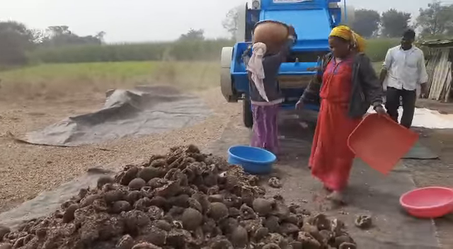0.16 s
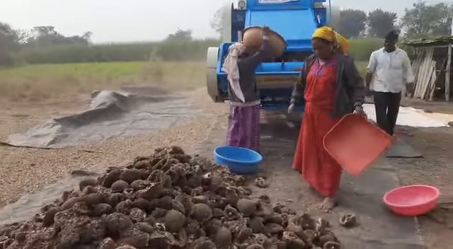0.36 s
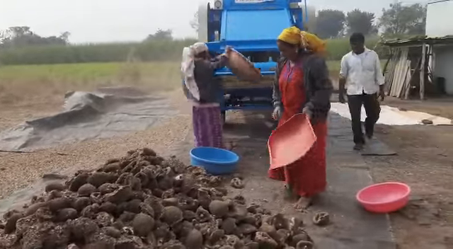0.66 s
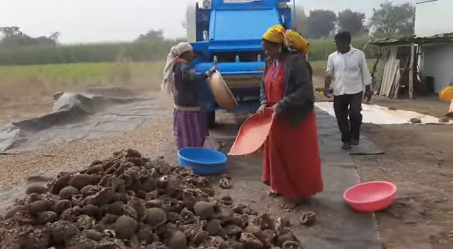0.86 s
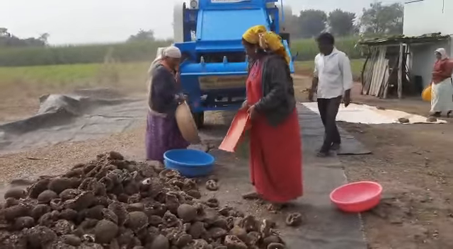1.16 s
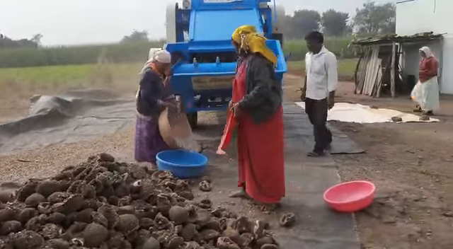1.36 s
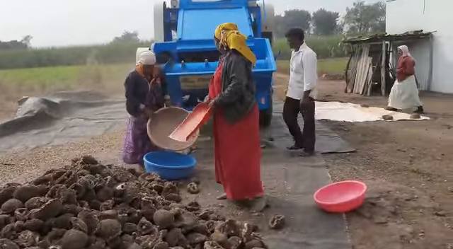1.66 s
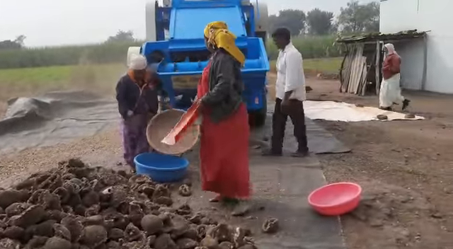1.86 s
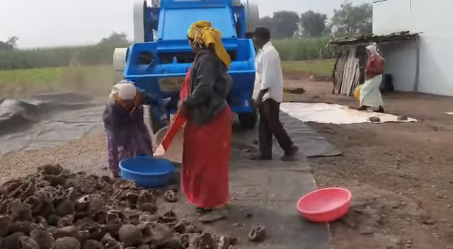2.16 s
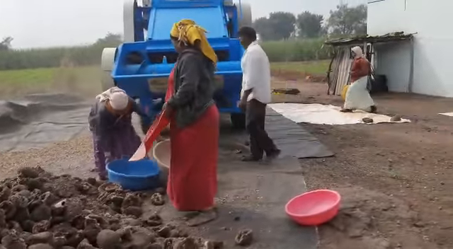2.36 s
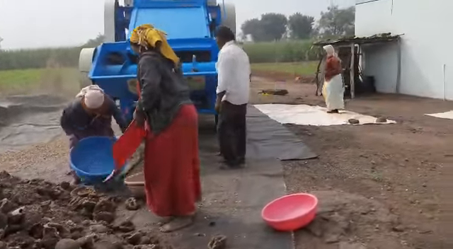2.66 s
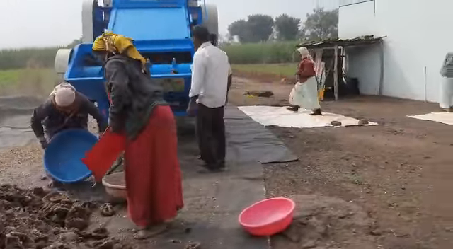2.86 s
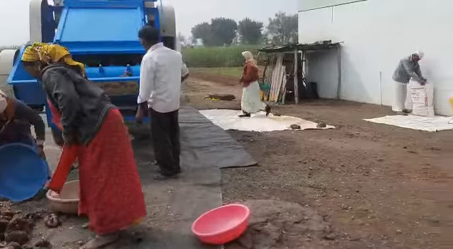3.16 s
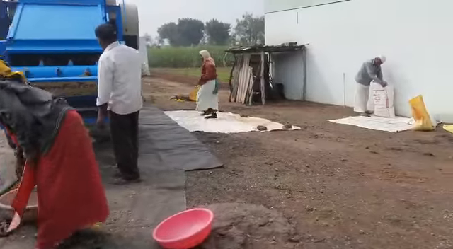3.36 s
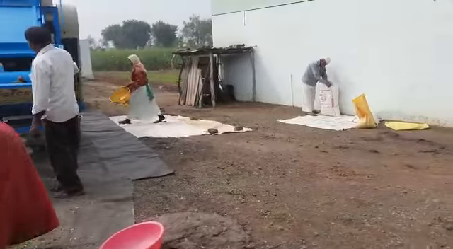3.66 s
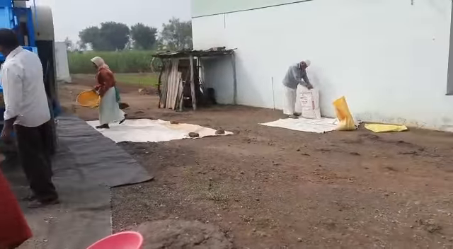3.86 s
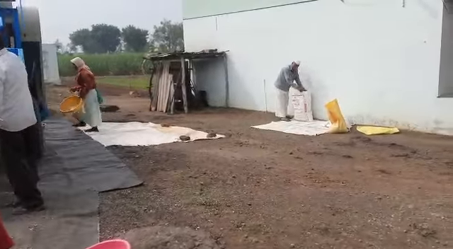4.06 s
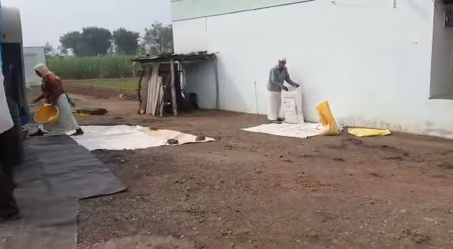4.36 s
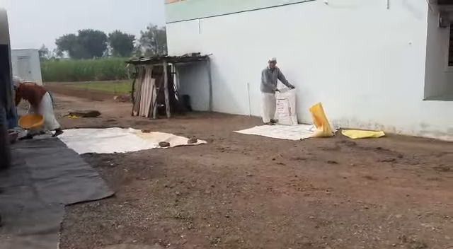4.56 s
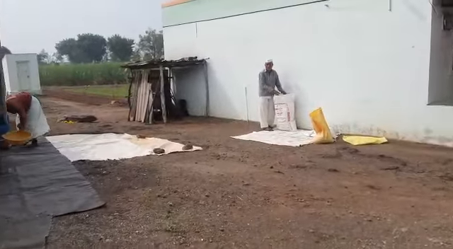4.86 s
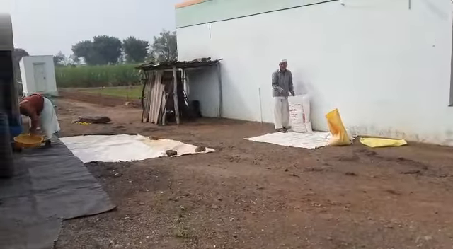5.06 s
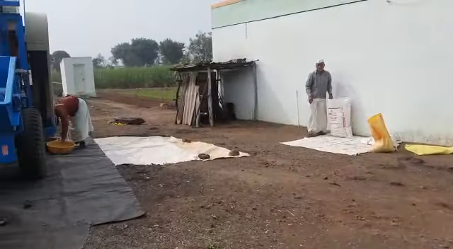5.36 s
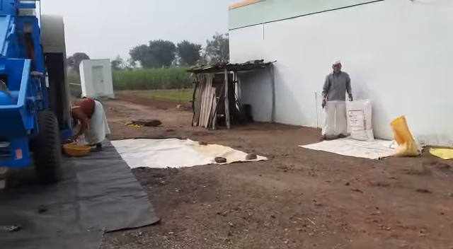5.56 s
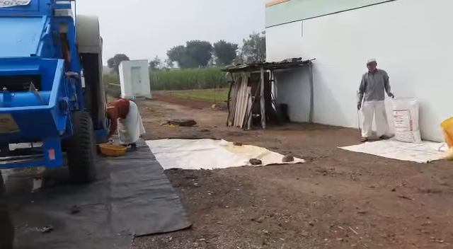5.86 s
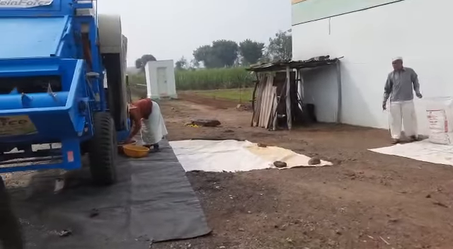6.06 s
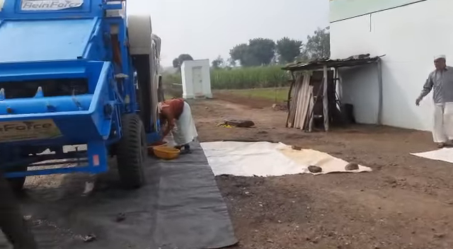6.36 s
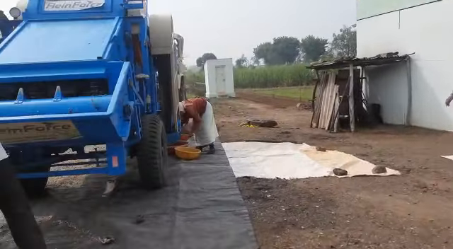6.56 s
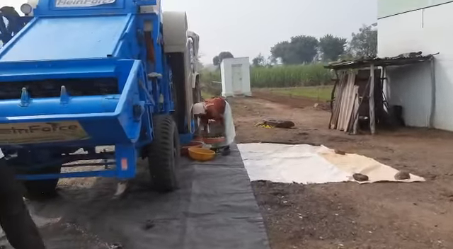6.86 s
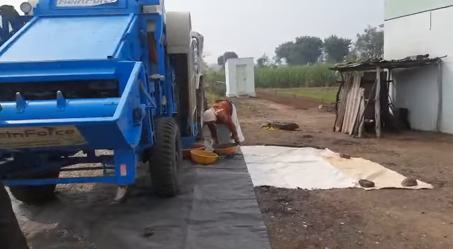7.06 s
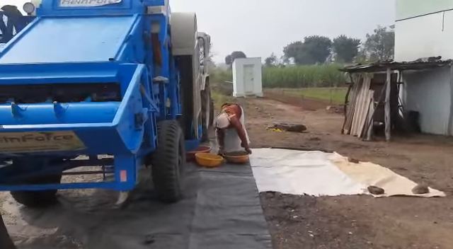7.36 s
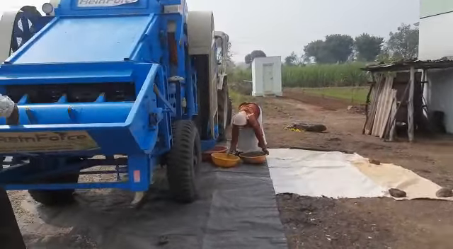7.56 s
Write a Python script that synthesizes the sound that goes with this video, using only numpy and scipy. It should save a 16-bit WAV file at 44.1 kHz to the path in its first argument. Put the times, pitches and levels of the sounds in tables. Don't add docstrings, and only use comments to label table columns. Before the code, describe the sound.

A threshing machine drones steadily in a farmyard, low blower hum over a knocking diesel engine, with hissing chaff, tiny jingling anklets and dry ticks.

```python
import sys
import numpy as np
from scipy import signal
from scipy.fft import rfft, irfft
from scipy.io import wavfile
from scipy.ndimage import uniform_filter1d

SR = 44100
rng = np.random.default_rng(int(sys.argv[2]) if len(sys.argv) > 2 else 0)


def elevation(decibels):
    levels = np.asarray(decibels, float)
    return 10 ** (levels / 20)


def generate_wav(sig):
    pcm = np.round(np.clip(np.atleast_2d(sig).T, -1, 1) * 32767).astype(np.int16)
    wavfile.write(sys.argv[1], SR, pcm)


N = 339570
TIME = np.arange(N) / SR
FREQ = np.arange(N // 2 + 1) * SR / N + 1e-3


def columns(table):
    s, *rest = np.transpose(table)
    return [np.interp(TIME, s, column) for column in rest]


def shape(table):
    hz, value = np.transpose(table)
    return np.interp(np.log(FREQ), np.log(hz), value)


def unit(x):
    return x / np.sqrt(np.mean(x ** 2))


def ring(x, modes):
    out = 0
    for hz, width, db in modes:
        b, a = signal.iirpeak(hz, hz / width, SR)
        out = out + elevation(db) * signal.lfilter(b, a, x)
    return unit(out)


def walk(rate):
    held = np.repeat(rng.standard_normal(int(N / SR * rate) + 2), 16)
    slewed = uniform_filter1d(uniform_filter1d(held, size=16), size=16)
    return 1.3 * np.interp(TIME * rate * 16, np.arange(len(held)), slewed)


def pan(x, db):
    return np.array([x * elevation(db / 2), x * elevation(-db / 2)])


def swell_db(s, half_s, lift_db):
    return lift_db * np.exp(-((TIME - s) / half_s) ** 2)


# (time [s], turned to the wall [0-1], abreast of the housing [0-1], close to the feed end [0-1])
BEARER = [(0, 0.04, 0, 0.03), (.6, 0.15, 0, 0), (1.1, 0.33, 0, 0), (2.2, .6, 0.05, 0), (3.2, 0.96, 0, 0.01),
          (4.4, 1, 0.02, 0.09), (5, 0.92, 0.06, 0), (5.5, 0.48, 0.83, 0), (6, .25, 1, 0.02),
          (6.6, 0.04, 0.98, 0.28), (7.1, .1, 1, 0.8), (7.7, 0.13, 0.87, 0.9)]


def heard(layer):
    start, *change = layer
    return start + np.dot(change, columns(BEARER))


# (frequency [Hz], level [dB per Hz])
RUMBLE = [(20, -68), (40, -79), (62, -62), (90, -52.5), (150, -55.5), (200, -54), (270, -53), (350, -56.5),
          (420, -58), (450, -63.5), (600, -64.5)]
# (frequency [Hz], level [dB per Hz])
AIR_LEFT = [(600, -64), (850, -58), (1250, -64.5), (1800, -63), (2300, -60), (3100, -72), (5300, -75.5),
            (6300, -69.0), (7500, -76), (9300, -79.5), (10700, -77.5), (12000, -72.5), (14500, -82),
            (15800, -84)]
AIR_RIGHT = [(600, -61), (800, -60.5), (1100, -66), (1700, -68.5), (2600, -73), (4000, -73.0),
             (6300, -71.5), (7500, -73.5), (8700, -77.0), (9300, -87.5), (10200, -86), (11500, -83),
             (13500, -84), (15800, -91)]
# (frequency [Hz], coherence [-1 to 1])
LIKENESS = [(60, .995), (250, 1), (400, 0.73), (520, 0.22), (720, 1), (1000, 0.34), (1300, 0.5),
            (1800, 0.4), (2300, 0.64), (3000, 0.14), (16000, 0.041)]
# (frequency [Hz], phase [radians])
LEAD = [(60, 0.3), (260, -0.16), (520, 0.8), (860, 0.5), (1290, -2), (1810, -4.5), (2240, -5), (16000, -2)]
# (time [s], half width [s], lift [dB])
CLUMPS = [
    (1.5, 0.077, 1.5),
    (2.62, .1, 1),
    (4.25, 0.067, 2.5),
    (5.35, .06, 0.5),
    (7.03, .1, 0.5),
]
RUMBLE_DB, MIDDLE_DB = (0, 3, 1, 1), (0.18, 0, -.2, 2.1)
LEFT_TREBLE_DB, RIGHT_TREBLE_DB = (-0.4, -0.1, 1.4, 3), (3.5, -3.5, -1.3, -1)


def air():
    low = FREQ < RUMBLE[-1][0]
    left_colour = elevation(np.where(low, shape(RUMBLE) + .7, shape(AIR_LEFT)))
    right_colour = elevation(np.where(low, shape(RUMBLE) - .7, shape(AIR_RIGHT)))
    like = np.clip(shape(LIKENESS), -.99, .99)
    one, other = rfft(rng.standard_normal((2, N)))
    right_noise = like * np.exp(-1j * shape(LEAD)) * one + np.sqrt(1 - like ** 2) * other
    spectrum = np.sqrt(SR / 2) * np.array([left_colour * one, right_colour * right_noise])
    rumble_db, middle_db = heard(RUMBLE_DB), heard(MIDDLE_DB)
    treble_db = np.array([heard(LEFT_TREBLE_DB), heard(RIGHT_TREBLE_DB)])
    feed = 0.3 * walk(3.07) + 0.79 * walk(11) + sum(swell_db(*row) for row in CLUMPS)
    place = 1.5 * np.log2(FREQ / 20)
    out = 0
    for k in range(16):
        hz = 20 * 2 ** (k * 2 / 3)
        bright = np.clip(np.log2(hz / 2500) / 2, 0, 1)
        dull = np.clip(np.log2(700 / hz), 0, 1)
        db = dull * rumble_db + (1 - dull) * (1 - bright) * middle_db
        db = db + bright * (treble_db + 0.17 * feed) + 0.73 * (hz > 2500) * feed
        flicker_db = 0.22 * walk(1.91) + .5 * walk(9)
        band = irfft(spectrum * np.clip(1 - abs(place - k), 0, 1), N)
        out = out + elevation(db + flicker_db) * band
    return out


SHOWER_ATTACK_S, SHOWER_FADE_DB_PER_S = .12, 18


def shower_db(showers, rest_db):
    power = elevation(2 * rest_db)
    for s, length_s, db in showers:
        fade_db = SHOWER_FADE_DB_PER_S * np.maximum(TIME - s - length_s, 0)
        attack = np.clip((TIME - s) / SHOWER_ATTACK_S + 1, 0, 1)
        power = power + attack ** 2 * elevation(2 * (db - fade_db))
    return 10 * np.log10(power)


# (frequency [Hz], width [Hz], level [dB])
BELLS = [(8980, 150, 0), (9900, 900, 0),
         (11380, 330, 0), (12200, 1100, 0)]
# (start [s], length [s], level [dB])
SHOWERS = [
    [(3.3, 2.15, -60.5), (7.5, .8, -63)],
    [(5.65, 2, -57), (6.0, 1.0, -54.5)],
    [(3.3, 1.3, -53.5), (4.9, .6, -57)],
    [(3.35, 1.2, -51.5), (4.75, 1, -49.5), (6, .9, -60)],
]
BELL_REST_DB = (-69, -66, -61, -65)


def anklets():
    hardness_db = np.minimum(3.0 * rng.exponential(size=N), 12) + 1.4 * walk(20)
    struck = rng.random(N) < 2500 / SR
    hits = struck * rng.standard_normal(N) * elevation(hardness_db)
    out = 0
    for showers, rest_db, bell in zip(SHOWERS, BELL_REST_DB, BELLS):
        out = out + elevation(shower_db(showers, rest_db)) * ring(ring(hits, [bell]), [bell])
    return pan(out, 18.5)


# (time [s], husk level [dB], bell level [dB], bell pitch [Hz])
TICKS = [(0.4264, -37, -39, 11000), (0.5222, -35, -42, 11000), (1.0834, -39, -41, 11000),
         (1.1608, -33, -42, 10500), (1.2431, -34, -44, 10500), (1.2895, -34, -43, 11000),
         (1.6636, -30.5, -35, 9800), (1.8756, -35, -41, 10500), (2.189, -31, -32, 11500),
         (2.5785, -32, -36, 10500), (3.2944, -35, -29.5, 10500), (3.3772, -33, -35, 11500),
         (3.4535, -34, -40, 10500), (3.6007, -41, -38, 11900), (3.6835, -42, -34, 11900),
         (3.8741, -36, -36, 11800), (4.136, -37, -36, 11900), (4.1989, -33, -31, 11900),
         (4.9387, -41, -39, 11900), (5.008, -36, -40, 11800), (5.666, -32, -34, 11500),
         (5.9589, -34, -38, 11000), (5.9853, -31, -35, 10200), (6.1394, -29.5, -32, 11500),
         (6.3919, -39, -36, 10700), (7.0968, -37, -34, 11500), (7.2838, -33, -38, 10800),
         (7.4096, -34, -39, 10500), (7.451, -34, -26.5, 9700)]
HUSK_HZ, HUSK_WIDTH_HZ, BELL_TICK_WIDTH_HZ = 6280, 2900, 4700
HUSK_T60_S, BELL_TICK_T60_S = 0.053, 0.073
HUSK_PAN_DB, BELL_TICK_PAN_DB = (3.3, 3.5, 3.6, 3.7), (1.8, 6.6, 5, 3)


def ticks():
    out, t = np.zeros((2, N)), np.arange(4000) / SR
    husk_pan_db, bell_pan_db = heard(HUSK_PAN_DB), heard(BELL_TICK_PAN_DB)
    attack = 1 - np.exp(-t / 0.00063)
    husk_fade = attack * np.exp(-np.log(1000) * t / HUSK_T60_S)
    bell_fade = attack * np.exp(-np.log(1000) * t / BELL_TICK_T60_S)
    for s, husk_db, bell_db, bell_hz in TICKS:
        husk_noise, bell_noise = rng.standard_normal((2, len(t)))
        husk_band = [(HUSK_HZ, HUSK_WIDTH_HZ, 0)]
        bell_band = [(bell_hz, BELL_TICK_WIDTH_HZ, 0)]
        husk = husk_fade * elevation(husk_db) * ring(ring(husk_noise, husk_band), husk_band)
        bell = bell_fade * elevation(bell_db) * ring(ring(bell_noise, bell_band), bell_band)
        i = int(s * SR)
        tick = pan(husk, husk_pan_db[i]) + pan(bell, bell_pan_db[i])
        out[:, i:i + len(t)] += tick[:, :N - i]
    return out


# (time [s], peak level [dB])
PANEL_KNOCK = [
    (5.011, -17.5),
]


def panel():
    s, peak_db = PANEL_KNOCK[0]
    t = np.maximum(TIME - s, 0)
    return pan(elevation(peak_db - 2.0) * np.exp(-t / 0.0031) * np.sin(2 * np.pi * 2450 * t), 5)


def tones(turns, orders, wander_db, lag, lead=0., pan_db=1.5):
    out, side = 0, np.array([[.5], [-.5]])
    for k, db in orders:
        level = elevation(db + wander_db * np.sqrt(k) * walk(1.175))
        skew = lead * min(k / 2, 1) ** 1.5 + .015 * wander_db * k ** 1.7 * walk(.5)
        phase = 2 * np.pi * k * turns - lag * (k - 1) ** 2 + side * skew
        out = out + np.sqrt(2) * level * np.cos(phase)
    return out * elevation(side * pan_db)


# (multiple of blade rate, level under the first [dB])
GEARS = [(4.556, 0), (1.585, -11), (2.425, -16), (7.282, -14), (7.551, -18), (4.858, -17), (16.71, -21),
         (15.9, -25), (14.0, -23)]
GEAR_DB = (-28, 0, -6, -7)
GEAR_LIFT = (4.06, 0.26, 2.7)


def gears(blades):
    level = elevation(heard(GEAR_DB) + swell_db(*GEAR_LIFT))
    return level * tones(blades, GEARS, .3, .3, heard(PORT_LEAD) / 2, pan_db=2.0)


CYLINDER_DB = [0, -2, -3]
# (frequency [Hz], width [Hz], level [dB])
BLOCK = [(2370, 330, 0), (1850, 350, -9)]
PIPE = [(790, 45, 0), (720, 40, -3), (678, 30, -3), (943, 40, -1), (1297, 50, -9)]
BLOCK_DB, PIPE_DB, KNOCK_PAN_DB = (-44.5, -4.5, -2.5, 4), (-58, 11.5, 13.5, -5), (12.5, -7, -7, 3)
KNOCK_LIFT = (6.8, .5, 3.2)


def knock(cycles):
    firing = 3 * cycles
    count = firing.astype(int)
    uneven_db = 1.2 * rng.standard_normal(count[-1] + 1)[count]
    size = elevation(np.array(CYLINDER_DB)[count % 3] + uneven_db)
    pulse = size * np.exp(-(firing % 1) / 0.01)
    clatter = .08 * size * np.exp(-(firing % 1) / .1) * rng.standard_normal(N)
    blow = np.diff(pulse, prepend=0) + clatter
    block = elevation(heard(BLOCK_DB) + swell_db(*KNOCK_LIFT)) * ring(ring(blow, BLOCK), BLOCK)
    pipe = elevation(heard(PIPE_DB)) * ring(pulse + 3.5 * blow, PIPE)
    return pan(block, heard(KNOCK_PAN_DB)) + pan(pipe, .5)


# (multiple of the four-stroke cycle, level [dB rms])
ENGINE_ORDERS = [(6, -28.5), (9, -39), (10, -47), (12, -41), (13, -62), (15, -44), (18, -45.5), (20, -48),
                 (21, -56), (23, -51), (24, -49), (25, -52), (30, -48)]


def engine(cycles):
    return tones(cycles, ENGINE_ORDERS, .3, .214, pan_db=.4) + knock(cycles)


# (multiple of blade rate, level [dB rms])
BLADE_ORDERS = [(1, -27.0), (1.5, -50), (1.75, -68), (2, -17.0), (3, -33.0), (4, -32.5), (5, -45.5),
                (6, -36.0), (7, -46), (8, -45), (9, -44), (10, -52.5), (12, -48.5)]
# (start [dB], turned [dB], abreast [dB], close [dB])
STRONG_BLADES_DB = [
    (-26.5, -.5, -6, 2),
    (-18.5, 0.8, 3.5, -3),
    (-44.5, 11.5, -0.5, 2),
    (-40, -8, -5.5, -10),
]
PORT_LEAD, PORT_PAN_DB = (0.11, 0.16, .08, .05), (-0.56, 0.64, -.4, .4)
# (time [s], half width [s], lift [dB])
SIXTH_LIFT, NINTH_LIFT = (2.95, .35, 3), (5.16, 0.56, 6.4)


def blower(blades):
    strong = (1, 2, 6, 9)
    weak = [row for row in BLADE_ORDERS if row[0] not in strong]
    lead = heard(PORT_LEAD)
    lifts_db = 0, 0, swell_db(*SIXTH_LIFT), swell_db(*NINTH_LIFT)
    strong_db = [heard(layer) + lift_db for layer, lift_db in zip(STRONG_BLADES_DB, lifts_db)]
    drone = tones(blades, zip(strong, strong_db), .15, .12, lead, heard(PORT_PAN_DB))
    return drone + tones(blades, weak, .4, .12, lead / 2, pan_db=.5)


# (time [s], blade rate [Hz])
BLADE_RATE = [
    (0, 56.41),
    (.7, 56.41),
    (1.7, 56.46),
    (3.9, 56.47),
    (5.0, 56.47),
    (5.7, 56.42),
    (6.6, 56.412),
    (7.7, 56.42),
]
CYCLE_PER_BLADE = .20666
START_TURNS = (.242, .343)


def machine():
    belt = np.cumsum(columns(BLADE_RATE)[0]) / SR
    blades = belt + START_TURNS[0]
    cycles = belt * CYCLE_PER_BLADE + START_TURNS[1]
    return blower(blades) + gears(blades) + engine(cycles)


def scene():
    return air() + anklets() + ticks() + panel() + machine()


def low_pass(x):
    return signal.sosfilt(signal.butter(12, 15810, fs=SR, output="sos"), x)


def record(dry):
    return low_pass(dry)


dry = scene()
out = record(dry)
generate_wav(out)
```